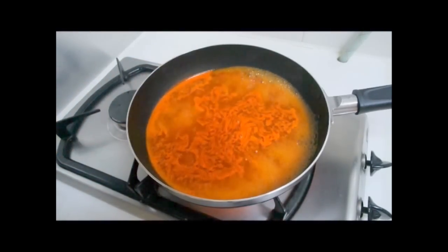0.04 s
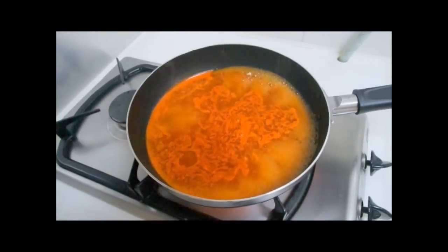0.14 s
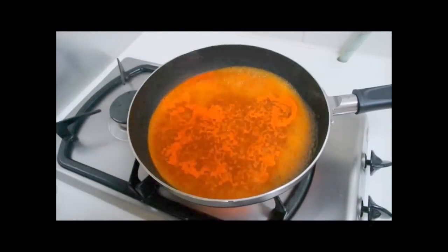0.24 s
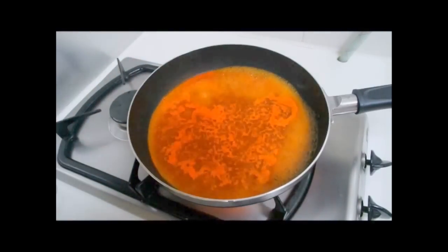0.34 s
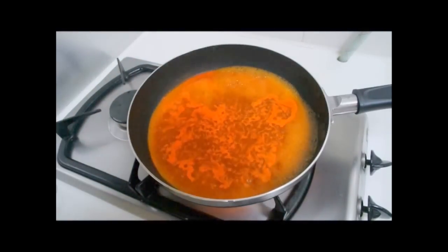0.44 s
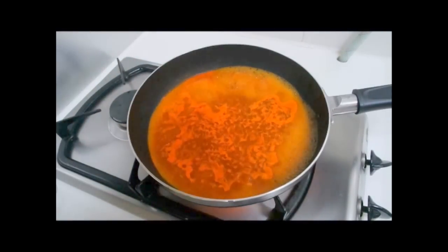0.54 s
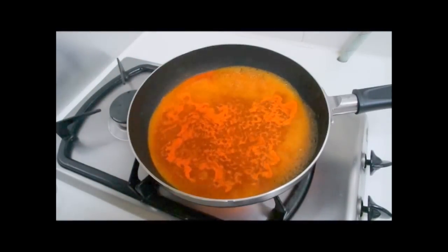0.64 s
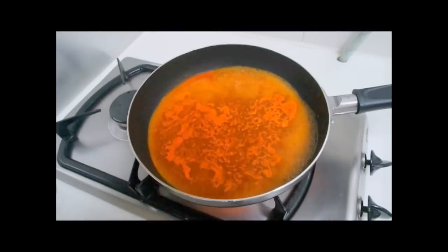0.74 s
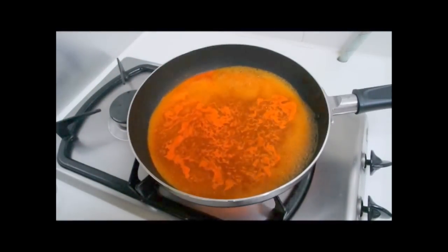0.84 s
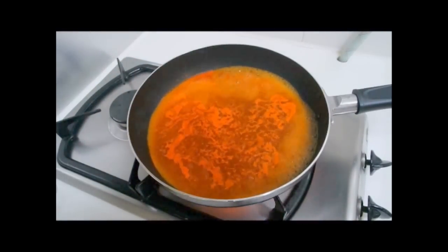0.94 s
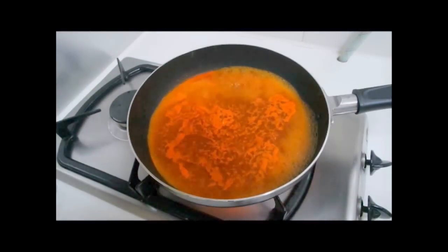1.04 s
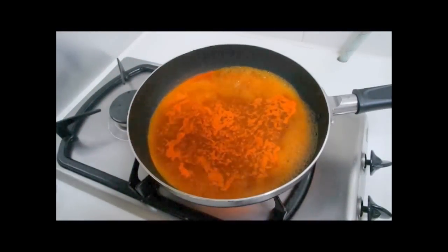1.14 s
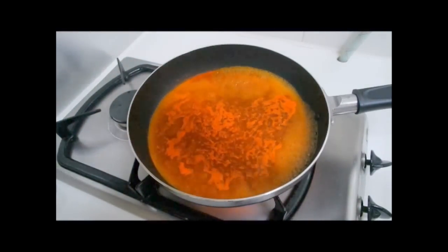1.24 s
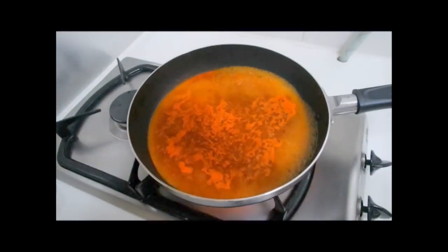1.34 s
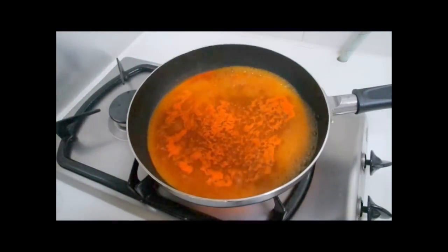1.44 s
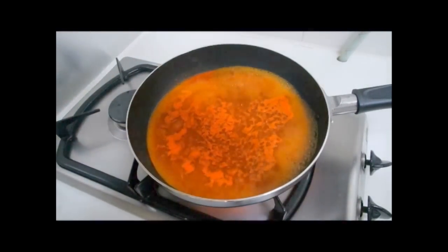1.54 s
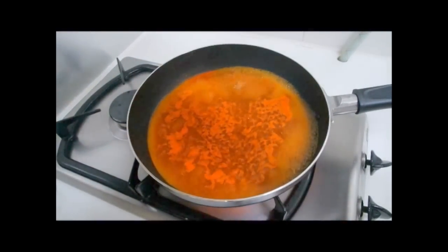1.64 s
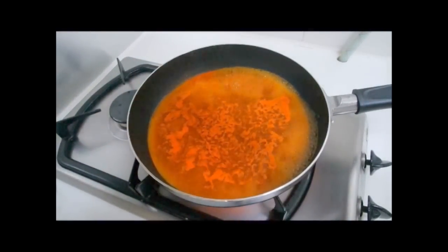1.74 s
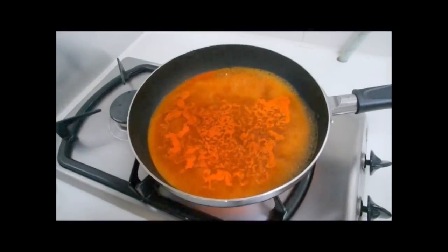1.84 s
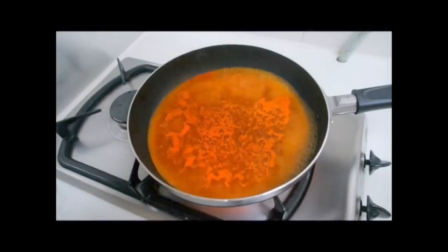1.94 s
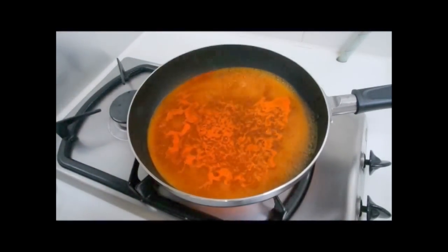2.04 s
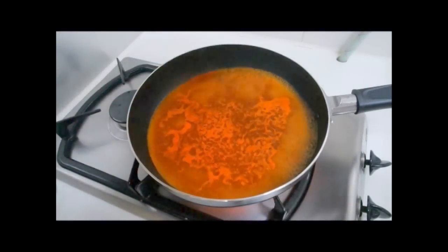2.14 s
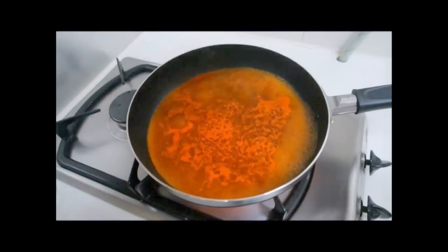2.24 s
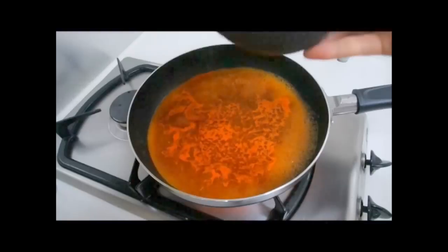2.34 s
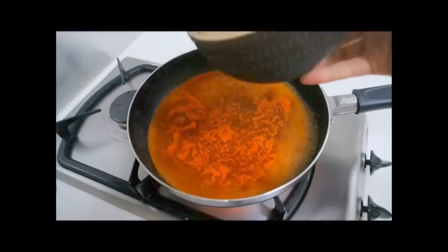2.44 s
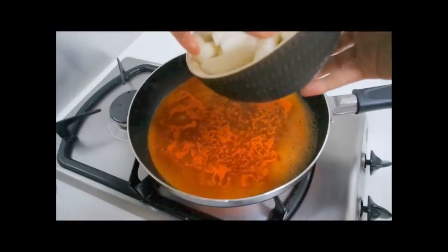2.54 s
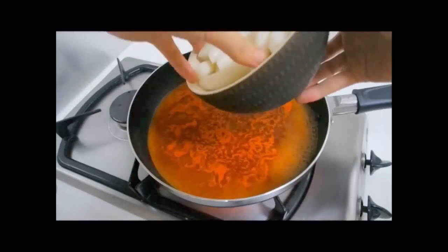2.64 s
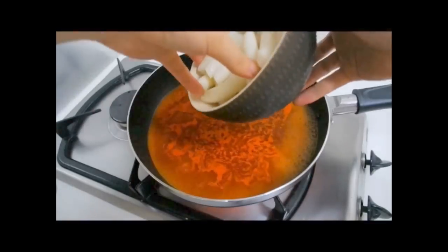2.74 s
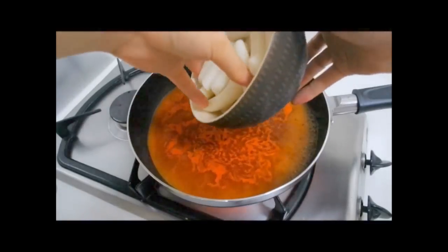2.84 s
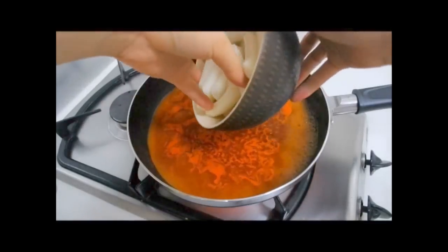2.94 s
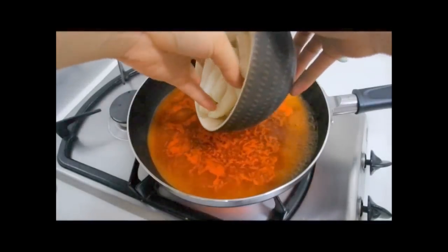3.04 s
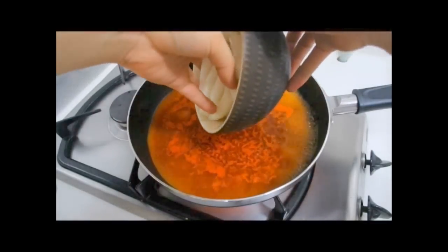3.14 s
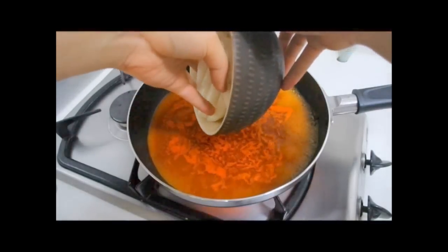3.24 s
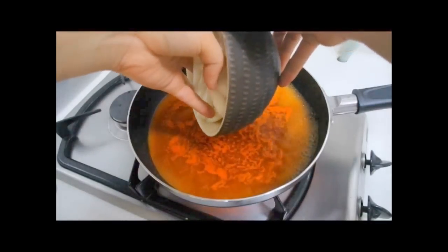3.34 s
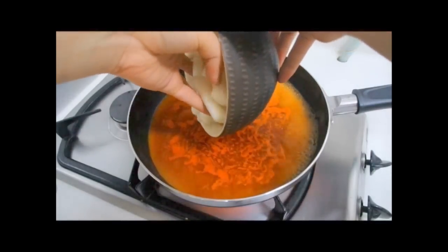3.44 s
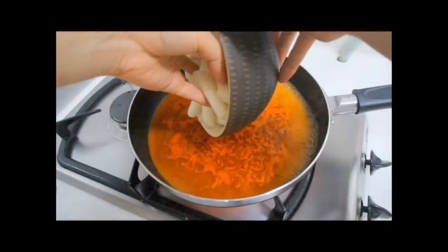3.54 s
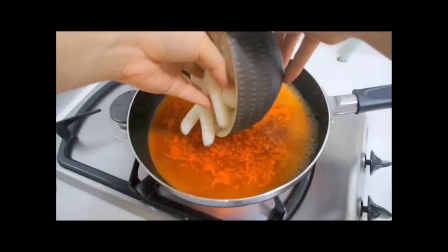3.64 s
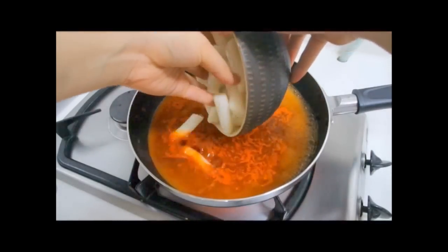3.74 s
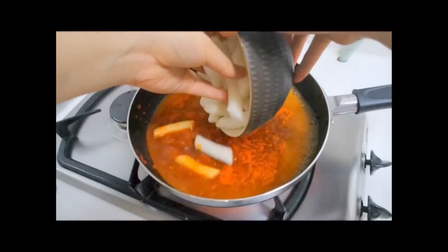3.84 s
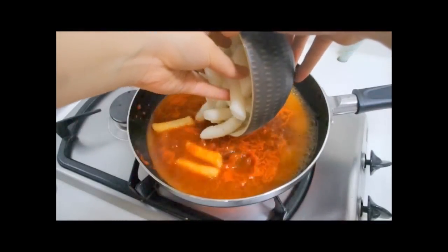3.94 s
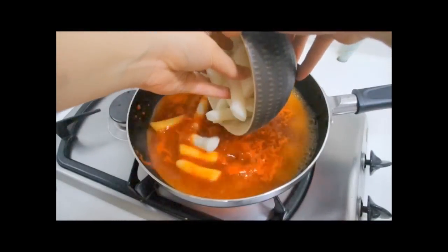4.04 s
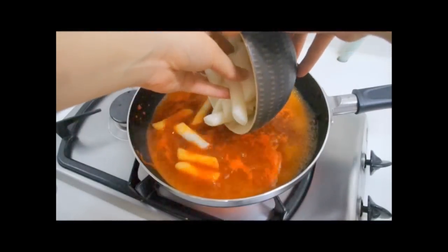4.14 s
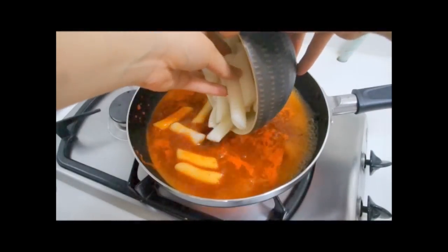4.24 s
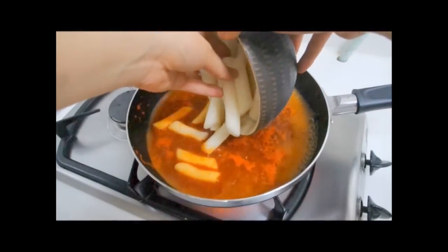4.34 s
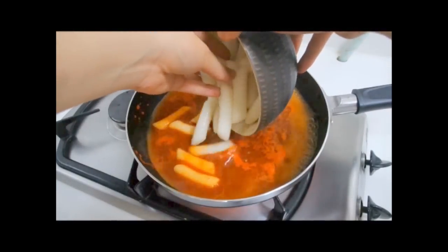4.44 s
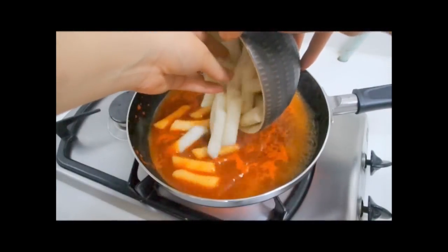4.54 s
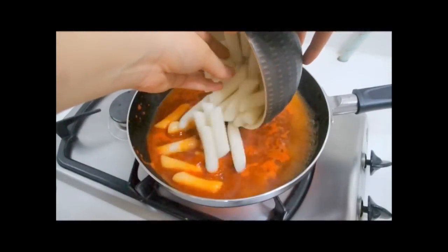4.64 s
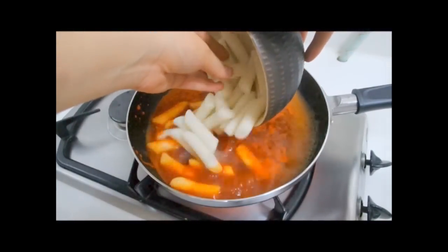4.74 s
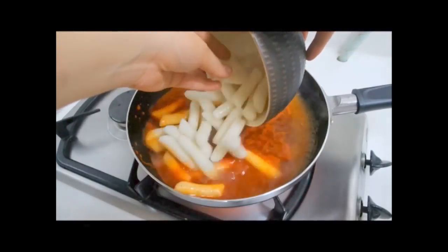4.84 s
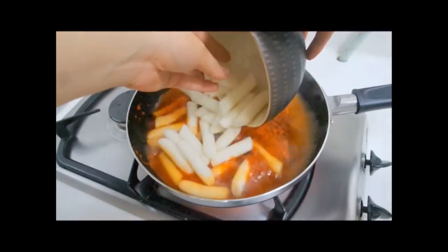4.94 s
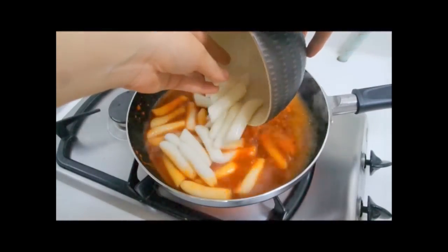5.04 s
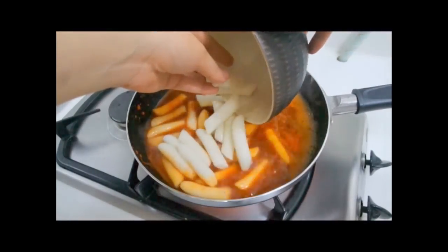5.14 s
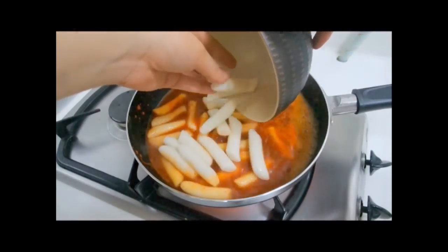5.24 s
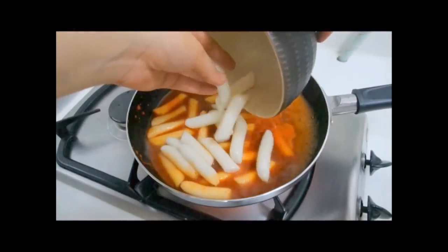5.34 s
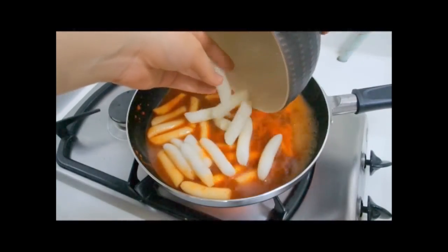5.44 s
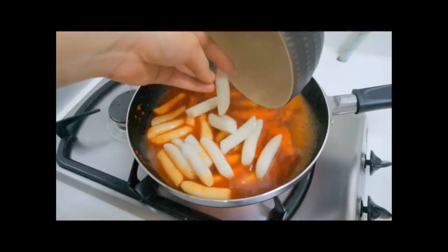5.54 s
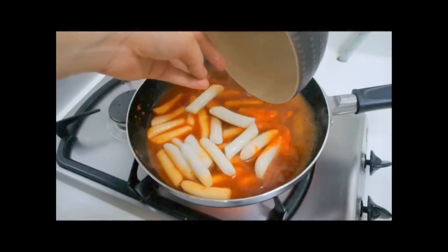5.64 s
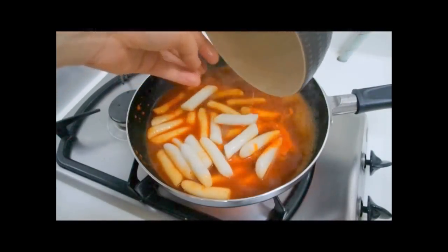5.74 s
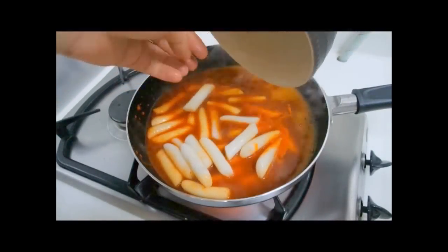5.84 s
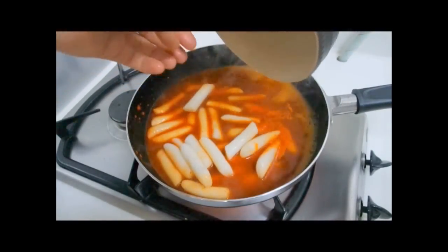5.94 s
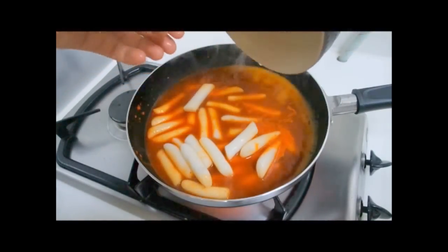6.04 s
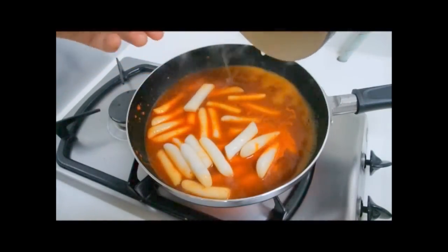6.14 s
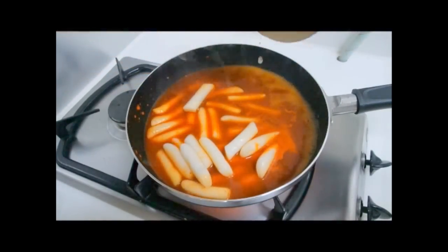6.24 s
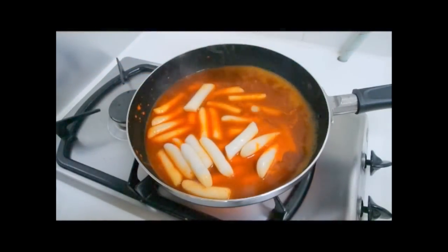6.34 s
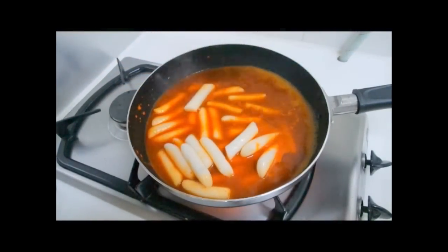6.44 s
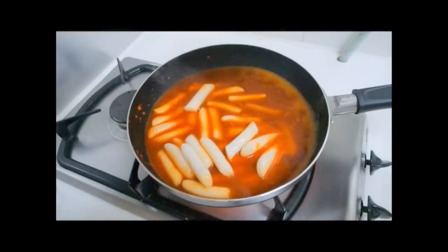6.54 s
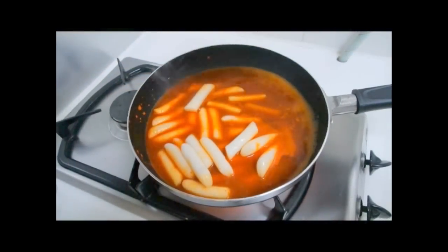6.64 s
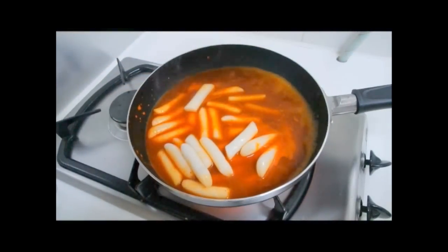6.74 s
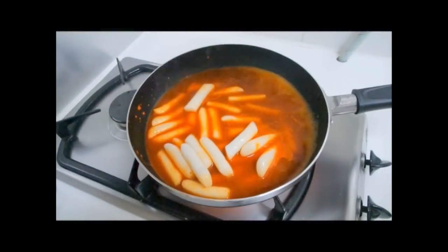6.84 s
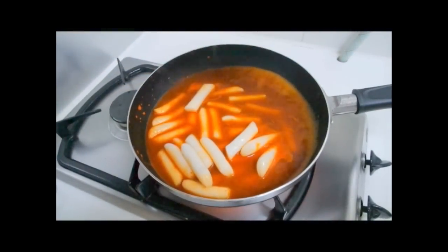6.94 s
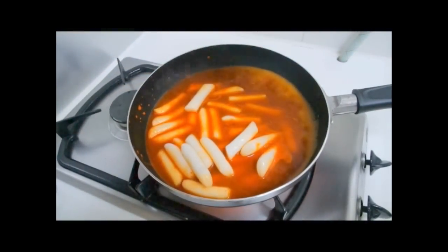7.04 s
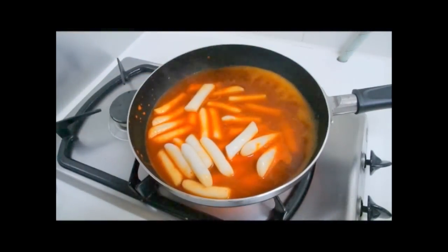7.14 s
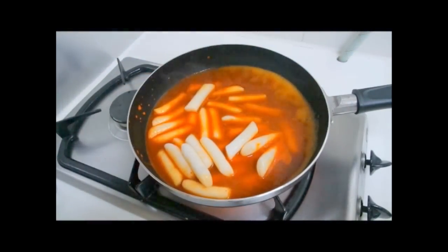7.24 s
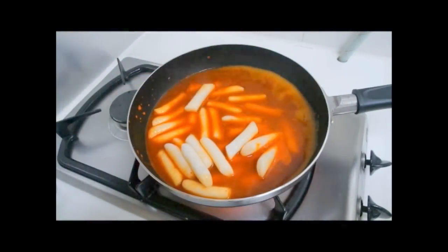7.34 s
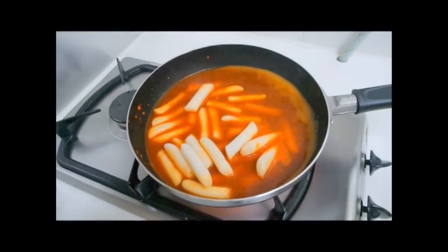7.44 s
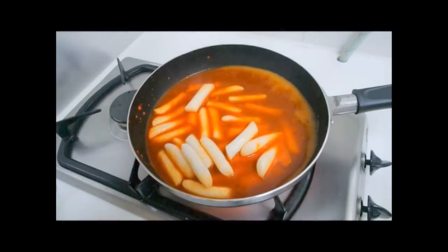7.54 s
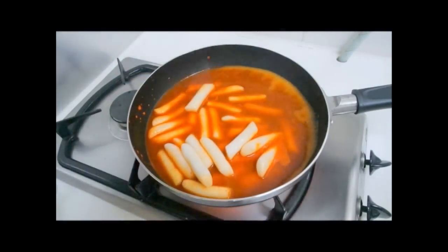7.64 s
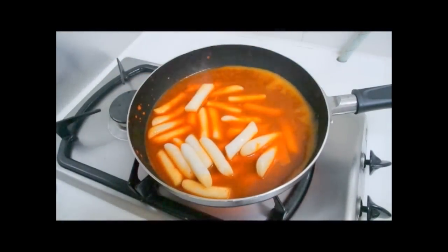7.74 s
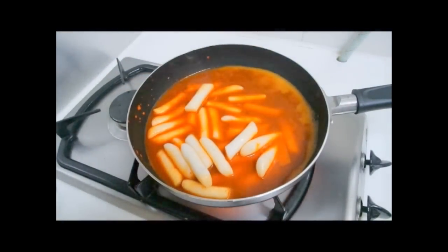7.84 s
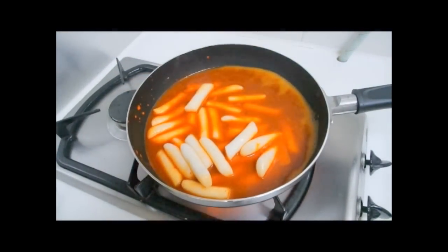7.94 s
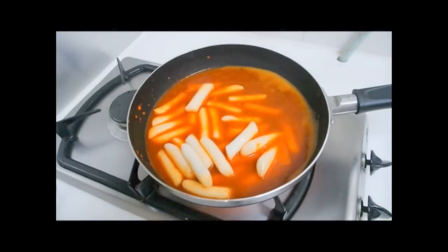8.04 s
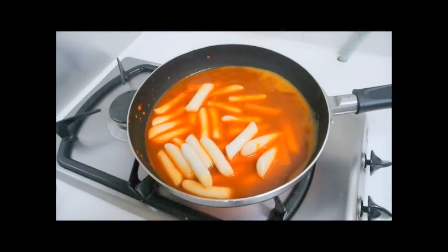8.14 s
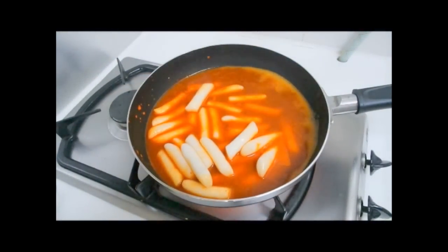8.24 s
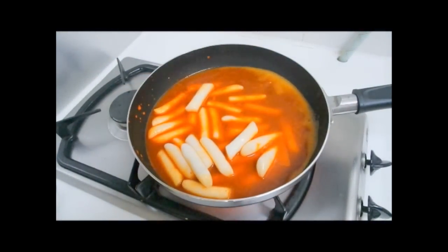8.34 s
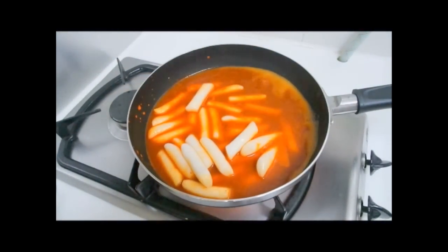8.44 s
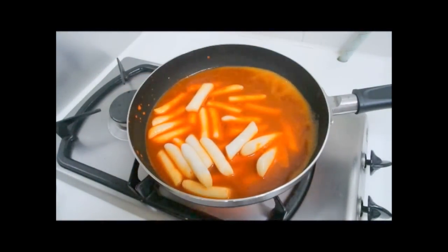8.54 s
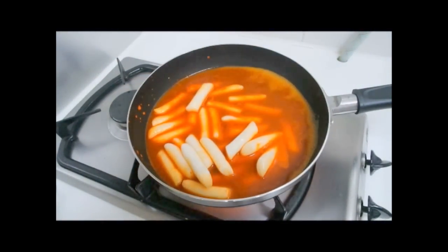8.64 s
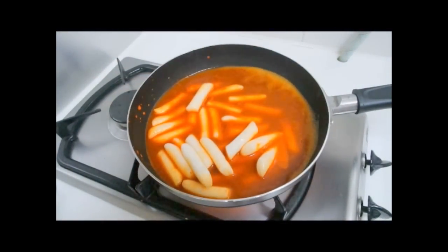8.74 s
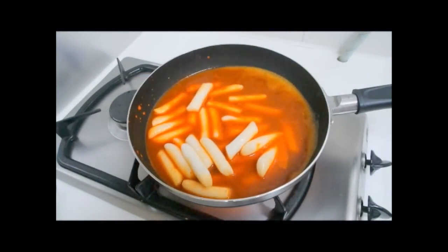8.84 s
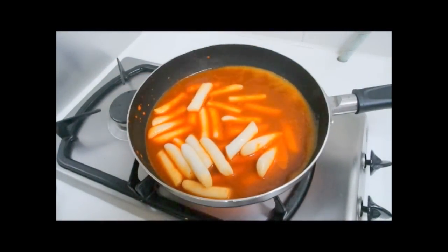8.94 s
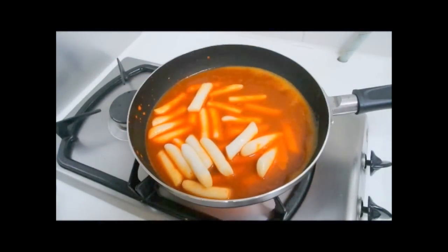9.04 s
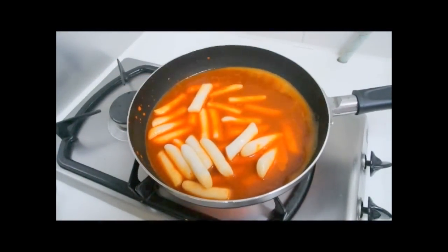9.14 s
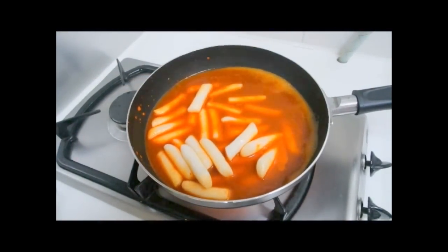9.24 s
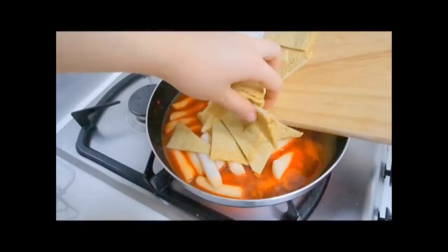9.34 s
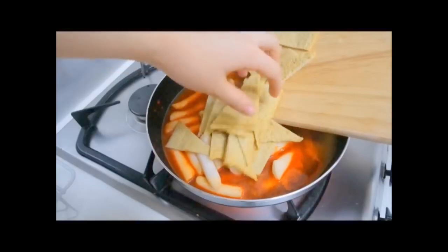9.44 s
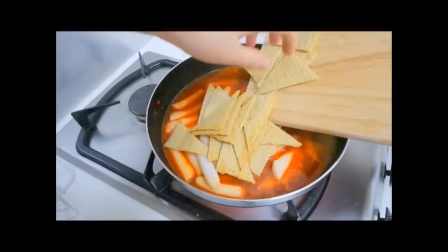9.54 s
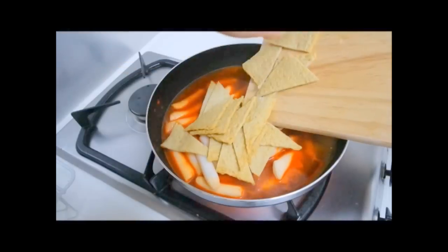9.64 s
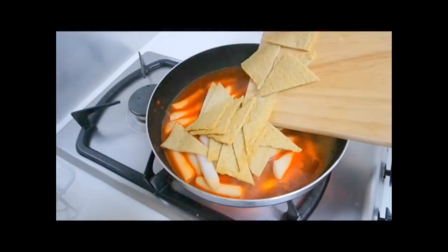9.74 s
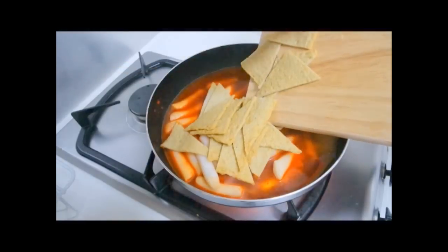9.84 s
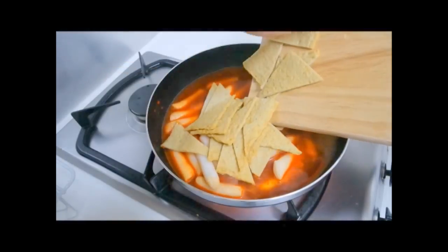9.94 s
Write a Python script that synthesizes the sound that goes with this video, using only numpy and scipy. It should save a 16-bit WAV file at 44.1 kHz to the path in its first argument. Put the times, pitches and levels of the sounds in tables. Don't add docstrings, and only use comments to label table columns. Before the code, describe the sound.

Close in a small kitchen, sauce sizzles softly over a hissing gas burner. A dry metal tick comes early, the sound drops out briefly and fades back, and the pan rocks with faint low ticks. Rice sticks then fall from a stoneware bowl in uneven surges, knocking the pan, splashing and ringing the bowl. Quiet simmering and rocking return, ending duller with a low handling rumble.

```python
import sys
import numpy as np
from scipy import signal
from scipy.fft import rfft, irfft, next_fast_len
from scipy.io import wavfile
from scipy.ndimage import uniform_filter1d, map_coordinates

SR = 44100
rng = np.random.default_rng(int(sys.argv[2]) if len(sys.argv) > 2 else 0)


def decibels_to_gain(level_db):
    exponent = np.asarray(level_db, float) / 20
    return 10 ** exponent


def put_to_file(sound):
    columns = np.atleast_2d(sound).T
    safe = np.clip(columns, -1, 1)
    whole_steps = np.round(safe * 32767)
    wavfile.write(sys.argv[1], SR, whole_steps.astype(np.int16))


N = 440118

SCENE_CHANGES = (.327, 9.42)
# time_s, level_db
SIMMER = [
    [(0.95, -57.5), (1.0, -53.5), (1.07, -56), (1.23, -54.5), (1.48, -56.5), (2.45, -55.5), (2.97, -60),
     (3.26, -57), (3.82, -59)],
    [(6.08, -58.5), (6.21, -57), (6.4, -59.5), (6.88, -57), (7.93, -56), (8.06, -56.5), (8.58, -59),
     (9.22, -56), (9.4, -56.5)],
]
# start_s, sizzle over boil_db, hiss over boil_db, hum_db, rumble_db
STRETCHES = [
    (0, -1, -5.5, -64, -63),
    (0.326, -1.5, -5.5, -66.5, -70.5),
    (4.9, -1, -8.5, -67, -71.5),
    (9.42, -8, -9, -67, -74),
]
# start_s, hold_s, tumbling_db, spray_db
SURGES = [(3.877, 0.11, -49, -53.5), (4.018, 0.17, -51, -54), (4.18, 0.056, -53, -50.5),
          (4.267, .04, -55.5, -55.5), (4.49, 0.026, -55.5, -59.5), (4.595, 0.11, -56.5, -59.5),
          (4.71, 0.12, -47.5, -53), (4.841, 0.098, -41.5, -54), (4.946, 0.16, -40.5, -54),
          (5.116, 0.078, -44.5, -54), (5.217, 0.054, -53.5, -58), (5.33, 0.096, -45, -55.5),
          (5.46, 0.027, -57, -59), (5.541, 0.052, -45.5, -55.5), (5.636, 0.14, -56, -59.5),
          (5.809, 0.067, -47, -53.5)]
# centre_hz, width_hz, level_db
PAN = [(426, 80, 0.5), (655, 166, -2.5), (713, 48, 4.5), (915, 132, -0.5), (1195, 600, -10),
       (1557, 340, -9), (1950, 740, -22)]
# centre_hz, width_hz, level_db
BOTTOM = [(111, 47, -3), (175.4, 48.5, 3.5), (226, 96, -1.5)]


def unit(x):
    return x / np.sqrt(np.mean(x ** 2) + 1e-20)


def along(points, hz):
    f, v = np.transpose(points)
    return np.interp(np.log(hz + 1), np.log(f + 1), v)


def curves(rows, **ends):
    s, *cols = np.transpose(sorted(map(tuple, rows)))
    t = np.arange(N) / SR
    return [np.interp(t, s, c, **ends) for c in cols]


def wobble(rate):
    knots = rng.standard_normal(int(N * rate / SR) + 4)
    return map_coordinates(knots, [np.arange(N) * rate / SR])


def noise():
    return rng.standard_normal(N)


def filtered(x, response):
    m = next_fast_len(N + SR // 2)
    return irfft(rfft(x, m) * response(np.fft.rfftfreq(m, 1 / SR)), m)[..., :N]


def modes(table):
    def response(f):
        total = 0
        for k, (centre, width, db) in enumerate(table):
            damping = 1j * f * width
            total = total + (-1) ** k * decibels_to_gain(db) * damping / (centre * centre - f * f + damping)
        return total
    return response


def patchy(patchy_db, size=(5, 14), x=None):
    z = signal.stft(noise() if x is None else x, nperseg=512)[2]
    field = uniform_filter1d(rng.standard_normal(z.shape), size=size[0], axis=0)
    field = uniform_filter1d(field, size=size[1], axis=1)
    return signal.istft(z * decibels_to_gain(patchy_db * unit(field)), nperseg=512)[1][:N]


def sparse(per_s, scatter_db):
    hits = rng.random(N) < per_s / SR
    size = decibels_to_gain(scatter_db * np.clip(rng.standard_normal(N), -2, 2))
    return hits * size * rng.choice([-1, 1], N)


def add(out, s, sound):
    i = round(s * SR)
    out[i:i + len(sound)] += sound[:N - i]


def ring(hz, t60, attack):
    t = np.arange(SR // 2) / SR
    return np.sin(2 * np.pi * hz * t) * decibels_to_gain(-60 * t / t60) * (1 - np.exp(-t / attack)) ** 2


def surges(level_db, fall_db_s):
    attack_s = 0.013
    t = np.arange(N) / SR
    power = np.zeros(N)
    for (s, hold, *_), db in zip(SURGES, level_db):
        u = t[round(s * SR):][:SR] - s
        rise = np.clip(u / attack_s, 0, 1)
        fall = decibels_to_gain(db - fall_db_s * np.clip(u - hold, 0, 9))
        add(power, s, (rise * fall) ** 2)
    return np.sqrt(power)


def spray():
    return surges([row[-1] for row in SURGES], fall_db_s=83.5)


def boil():
    boil_db = curves(sum(map(list, SIMMER), []))[0]
    return boil_db.mean(), boil_db - boil_db.mean()


def balance(column):
    starts, *levels = np.transpose(STRETCHES)
    stretch = np.searchsorted(starts, np.arange(N) / SR, side="right") - 1
    return levels[column - 1][stretch]


def deep_rumble():
    # frequency_hz, level_db
    rumble_shape = [(8.8, -38), (15, 1.5), (38, 2), (96, -4.5), (118, -16.5), (140, -12), (180, -37),
                    (310, -120)]
    rumble = unit(filtered(noise(), lambda hz: decibels_to_gain(along(rumble_shape, hz))))
    return rumble * decibels_to_gain(balance(4) + 1.2 * wobble(5))


def room_hum():
    # frequency_hz, level_db
    hum_shape = [(65, -38.5), (110, -2.5), (348, -8.5), (382, -11), (436, -3), (478, -11), (878, -2.5),
                 (1180, -8), (1400, -4), (1660, -7.5), (2600, -18), (3380, -44), (5720, -120)]
    hum = unit(filtered(patchy(patchy_db=3.0, size=(1, 20)), lambda hz: decibels_to_gain(along(hum_shape, hz))))
    swing_db = boil()[1]
    return hum * decibels_to_gain(balance(3) + 0.42 * swing_db + 1.28)


def burner_hiss():
    # frequency_hz, level_db
    hiss_shape = [(1060, -45), (1800, -14), (2760, -6.5), (3390, -4), (4640, -2.5), (5070, -1.5),
                  (6010, -3), (8280, -4.5), (14400, -5), (15200, -4.5)]
    # centre_hz, width_hz, lift_db
    grille = [(8720, 68, 0), (10000, 90, 0.5), (11470, 110, 4), (12400, 190, 2.5), (13300, 110, 6.5)]
    ridges = lambda hz: sum(db / (1 + ((hz - c) / w) ** 2) for c, w, db in grille)
    jets = patchy(patchy_db=2.5, size=(2, 8))
    hiss = unit(filtered(jets, lambda hz: decibels_to_gain(along(hiss_shape, hz) + ridges(hz))))
    dulled_hiss = filtered(hiss, lambda hz: decibels_to_gain(-3.5 * np.exp(-((hz - 6500) / 1000) ** 2)))
    mean_db, swing_db = boil()
    steady = decibels_to_gain(mean_db + 0.62 * swing_db + balance(2) + 6.5)
    hiss = np.where(np.arange(N) / SR < SCENE_CHANGES[1], hiss, dulled_hiss)
    return hiss * np.hypot(steady, decibels_to_gain(4.0) * spray()) * decibels_to_gain(0.83 * wobble(15))


def sizzle():
    # centre_hz, width_hz, level_db
    rim = [(2390, 390, -9), (3054, 470, -3.5), (3660, 496, -2), (5174, 240, -2), (5930, 350, -1.5),
           (6790, 460, -6)]
    bubbles = unit(patchy(patchy_db=4.5, size=(2, 11))) + 0.33 * unit(sparse(per_s=530, scatter_db=0.0))
    bright = unit(filtered(bubbles, modes(rim)))
    dulled_fizz = unit(filtered(bubbles, lambda hz: modes(rim[:4])(hz) / (1 + (hz / 5500) ** 30)))
    fizz = np.where(np.arange(N) / SR < SCENE_CHANGES[1], bright, dulled_fizz)
    mean_db, swing_db = boil()
    simmer = decibels_to_gain(mean_db + swing_db + balance(1))
    return fizz * np.hypot(simmer, decibels_to_gain(1.0) * spray()) * decibels_to_gain(0.37 * wobble(7))


def background():
    # time_s, gain_db
    fades = [(.326, 3.5), (.335, -18), (.399, -44), (.647, -26), (.811, -10), (.891, 1.5), (1.0, 0),
             (9.81, 0), (9.92, -3), (9.98, -5.5)]
    return (sizzle() + burner_hiss() + room_hum() + deep_rumble()) * decibels_to_gain(curves(fades)[0])


def low_noise(levels, hz, width_hz):
    twice = lambda f: modes([(hz, width_hz, 0)])(f) ** 2
    return unit(filtered(noise(), twice)) * decibels_to_gain(curves(levels, left=-120, right=-120)[0] - 0.2)


def flame_drone():
    # time_s, level_db
    drone_levels = [(0.0, -54), (0.098, -58.5), (0.18, -59.5), (0.304, -64.5), (0.32, -54)]
    return low_noise(drone_levels, hz=172, width_hz=28)


def offset_drift():
    # time_s, level_db
    drift_levels = [(.36, -87.5), (.6, -90.5), (.85, -61.5), (1.0, -66), (1.2, -84)]
    return decibels_to_gain(curves(drift_levels, left=-120, right=-120)[0])


def far_appliance():
    # time_s, level_db
    motor_levels = [(7.79, -82), (7.842, -68.5), (8.12, -74), (8.198, -89), (8.49, -81), (8.542, -76),
                    (9.276, -68), (9.42, -72)]
    return low_noise(motor_levels, hz=105, width_hz=22)


def board_handling():
    # time_s, level_db
    handling_levels = [(9.4, -70), (9.426, -66), (9.568, -55), (9.622, -53), (9.658, -50.5), (9.8, -53),
                       (9.922, -67), (9.98, -68.5)]
    return low_noise(handling_levels, hz=36, width_hz=14)


def metal_ticks():
    # time_s, peak_db, treble_db
    tick_events = [
        (0.257, -35.5, -3.5),
        (0.476, -92, 14),
        (0.66, -66, -1),
    ]
    low = ring(700, 0.011, 0.00021) + 0.67 * ring(1110, 0.014, 0.0003)
    high = ring(2540, 0.0066, 0.00021) + ring(3300, 0.01, 0.0002) + ring(4340, 0.013, 0.00016)
    out = np.zeros(N)
    for s, db, treble_db in tick_events:
        add(out, s, decibels_to_gain(db + 4.0) * low)
        add(out, s, decibels_to_gain(db + treble_db + 4.0) * high)
    return out


def pan_rocking():
    # time_s, peak_db, tick_db
    rock_events = [(1.381, -69, -3), (1.543, -60, -11), (1.625, -58, -3), (1.746, -58.5, -3),
                   (1.928, -59, -1), (2.059, -66, -3), (2.2, -74, -1), (2.346, -59, -7), (2.499, -82, 4),
                   (6.403, -60, 2), (6.512, -66, 0), (6.607, -63, -2), (6.702, -69.5, 4), (6.805, -65, 3),
                   (6.915, -61.5, -13), (7.004, -58.5, -3), (7.115, -64, 1.5), (7.37, -68, -4),
                   (7.584, -61, -5), (7.68, -63.5, 1), (7.886, -63.5, -7.5), (7.976, -59, -6),
                   (8.074, -63, 1), (8.181, -60.5, 2)]
    out = np.zeros(N)
    for (s, db, tick_db), shift in zip(rock_events, rng.normal(1, 0.034, len(rock_events))):
        note = ring(190 * shift, 0.093, 0.0059)
        tick = ring(620 * shift, 0.0077, 0.00057) + 0.28 * ring(950 * shift, 0.0091, 0.00027)
        add(out, s, decibels_to_gain(db + 11.0) * note + decibels_to_gain(db + tick_db + 20.5) * tick)
    return out


def bowl_ring():
    # time_s, peak_db
    bowl_strikes = [
        (3.6875, -49),
        (5.3556, -25.5),
        (5.591, -25),
    ]
    out = np.zeros(N)
    for s, db in bowl_strikes:
        add(out, s, decibels_to_gain(db - 14.0) * ring(1346, 0.34, 0.0013))
    return out


def crackle(bursts):
    return filtered(bursts, modes([(4700, 1600, -4.0), (6450, 1500, 4.5), (11500, 8100, 0)]))


def droplets():
    # time_s, peak_db
    spit_events = [(0.0169, -46), (0.4755, -65.5), (3.894, -41), (4.036, -30.5), (4.0497, -20),
                   (4.189, -37), (4.671, -35), (4.723, -34), (4.75, -33), (4.9488, -24.5), (5.081, -35),
                   (5.149, -32), (5.859, -34), (7.2993, -59), (7.9423, -52), (8.007, -49), (8.465, -47),
                   (8.527, -44), (8.8792, -51), (9.236, -44), (9.3018, -46)]
    t = np.arange(SR // 8) / SR
    out = np.zeros(N)
    for s, db in spit_events:
        add(out, s, decibels_to_gain(db - 4) * rng.standard_normal(len(t)) * decibels_to_gain(-60 * t / 0.019))
    return crackle(out)


def tumbling():
    # centre_hz, width_hz, level_db
    stove = [(44.8, 34, 0), (80.6, 16, -2.5)]
    fall_db_s, stove_fall_db_s = 218, 120
    tumble_db = np.transpose(SURGES)[2]
    heavy_db = lambda share: -48 + share * (tumble_db + 47.5)
    pushes = unit(sparse(per_s=270, scatter_db=0.5)) + 0.39 * noise()
    soft = lambda hz: modes(PAN)(hz) / (1 + 1j * hz / 1500) ** 2
    body = unit(filtered(pushes, soft)) * surges(tumble_db - 1.5, fall_db_s)
    drum = unit(filtered(noise(), modes(BOTTOM))) * surges(heavy_db(0.58) - 0.5, fall_db_s)
    stove_top = lambda hz: modes(stove)(hz) * modes([(60, 90, 0)])(hz)
    shake = unit(filtered(noise(), stove_top)) * surges(heavy_db(0.72) - 2.3, stove_fall_db_s)
    return body + drum + shake


def knocks():
    # time_s, peak_db,
    # pitch_hz, hardness_db, weight_db
    blow_events = [(3.881, -26, 820, -25, -9), (3.89, -23.5, 623, -20, -9), (3.918, -28.5, 810, -15, -11),
                   (3.93, -31, 610, -19.5, -16), (3.959, -24.5, 770, -38, -9.5),
                   (4.023, -34.5, 700, -19, -6), (4.031, -35, 915, -30, -16), (4.046, -11, 786, -18.5, -27),
                   (4.066, -29, 806, -17, -21), (4.111, -28.5, 522, -16, -11), (4.123, -30, 920, -21, -17),
                   (4.184, -20, 835, -25, -13.5), (4.207, -19.5, 840, -30, -17),
                   (4.492, -42.5, 900, -11, -0.5), (4.595, -41.5, 535, -9, -11),
                   (4.64, -32.5, 640, -10, -14.5), (4.713, -27, 507, -20, -24),
                   (4.719, -19, 830, -12.5, -25), (4.746, -11.5, 926, -10, -25),
                   (4.761, -22.5, 810, -15, -21),
                   (4.823, -29.5, 877, -10, -21), (4.847, -21, 973, -19, -17), (4.876, -29, 910, -30, -22),
                  (4.907, -21.5, 947, -28, -18), (4.917, -18, 915, -38, -21), (4.934, -34, 940, -7, -5),
                  (4.991, -34, 900, -10.5, -22), (5.078, -20, 647, -38, -22), (5.119, -29, 770, -24, -9),
                  (5.159, -35, 870, -14, -19), (5.185, -28, 820, -34, -25), (5.253, -37, 890, -23, -20),
                  (5.302, -40, 743, -7, -13), (5.352, -28, 874, -27, -10), (5.553, -33.5, 880, -24, -8),
                  (5.636, -42, 696, 1, -5), (5.686, -44.5, 950, -8, 2), (5.752, -36, 755, -17, -18),
                  (5.791, -36, 860, -22, -22), (5.813, -21.5, 915, -41, -13.5), (5.828, -31, 820, -15, -23),
                  (9.218, -49, 960, -12, -23), (9.684, -48, 931, -10, -13)]
    out, tail, upper, crack, thud = np.zeros((5, N))
    t = np.arange(SR // 8) / SR
    for s, db, hz, hardness_db, weight_db in blow_events:
        grain = rng.standard_normal(len(t))
        blow = ring(hz, 0.02, 0.0014)
        blow = blow - 0.45 * ring(1.45 * hz, 0.016, 0.0014) + 0.4 * ring(0.55 * hz, 0.02, 0.0012)
        add(out, s, decibels_to_gain(db + 5) * blow)
        bounces = grain ** 3 * decibels_to_gain(-60 * t / 0.21)
        add(tail, s + 0.00402, decibels_to_gain(db - 12.5) * bounces)
        clack = grain[::-1] * decibels_to_gain(-60 * t / 0.031) + 6 * ring(2.17 * hz, 0.0058, 0.00069)[:len(t)]
        add(upper, s + 0.001534, decibels_to_gain(db + hardness_db + 3) * clack)
        crack_db = -52 + 0.26 * (db + 28.5)
        add(crack, s + 0.0042, decibels_to_gain(crack_db) * grain * decibels_to_gain(-60 * t / 0.014))
        add(thud, s, decibels_to_gain(db + weight_db + 25.0) * grain[::-1] * decibels_to_gain(-60 * t / 0.046))
    upper = filtered(upper, modes([(1400, 200, -5.5), (2000, 680, -4.5), (2980, 460, 2.5)]))
    return out + filtered(tail, modes(PAN)) + upper + crackle(crack) + filtered(thud, modes(BOTTOM))


def scene():
    # frequency_hz, side under middle_db
    steady_width = [(30, -50), (300, -35.5), (1200, -32), (1900, -14), (2600, -32), (15000, -34)]
    # frequency_hz, side under middle_db
    food_width = [(100, -53), (700, -48), (1500, -20), (2500, -21), (4500, -24), (6500, -33), (8000, -22.5),
                  (11000, -34), (14000, -17)]
    steady = background() + flame_drone() + offset_drift() + far_appliance() + board_handling() + metal_ticks()
    food = pan_rocking() + bowl_ring() + droplets() + tumbling() + knocks()
    splash = food + steady * np.interp(np.arange(N) / SR, [3.85, 3.9, 5.9, 6], [0, 1, 1, 0])
    steady_side = filtered(steady, lambda hz: 1j * decibels_to_gain(along(steady_width, hz)))
    food_side = filtered(splash, lambda hz: 1j * decibels_to_gain(along(food_width, hz) - 9.5))
    side = patchy(patchy_db=3.5, size=(12, 4), x=steady_side) + patchy(patchy_db=10, size=(14, 4), x=food_side)
    return steady + food + np.array([side, -side])


def low_pass(x):
    return signal.sosfilt(signal.butter(12, 15960, fs=SR, output="sos"), x)


def record(dry):
    mix = filtered(dry, lambda hz: hz < 15100)
    return low_pass(mix)


dry = scene()
out = record(dry)
put_to_file(out)
```